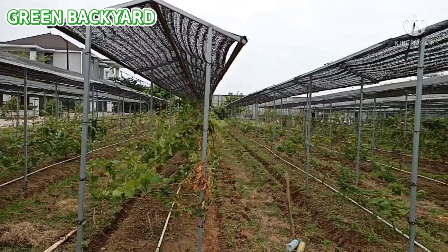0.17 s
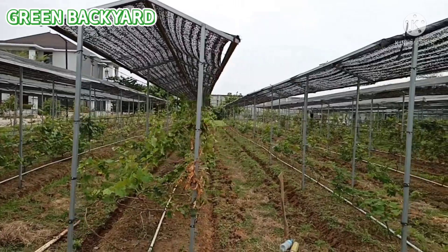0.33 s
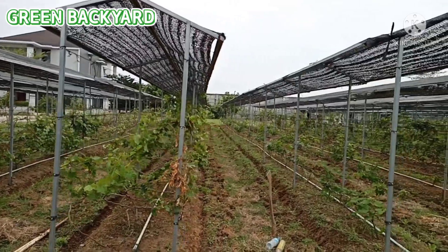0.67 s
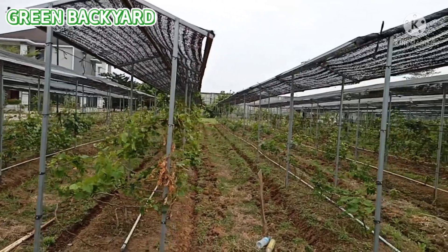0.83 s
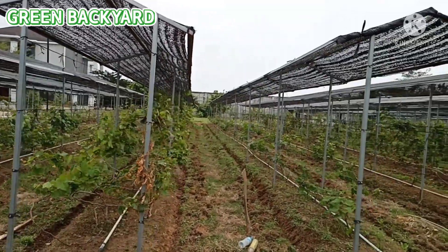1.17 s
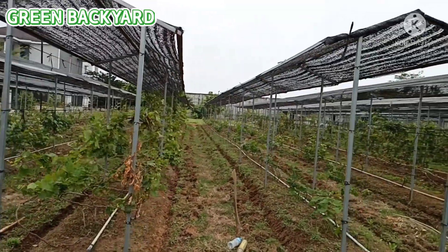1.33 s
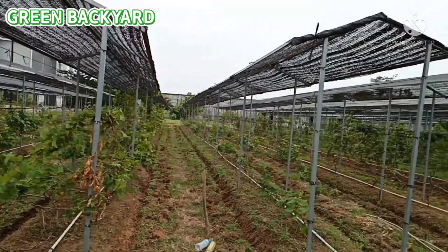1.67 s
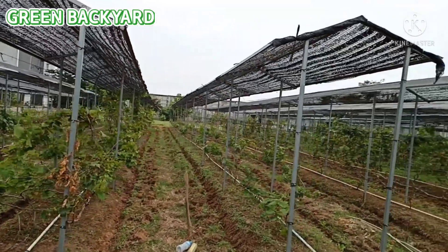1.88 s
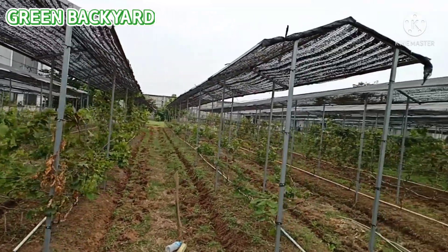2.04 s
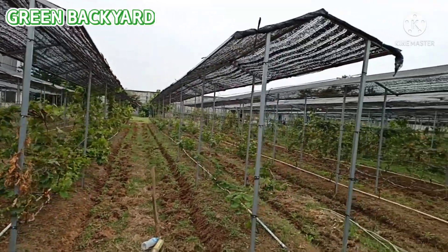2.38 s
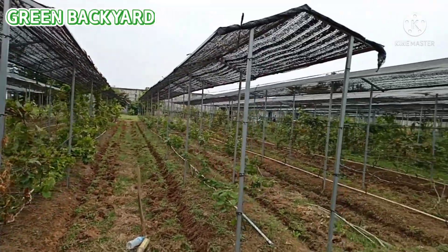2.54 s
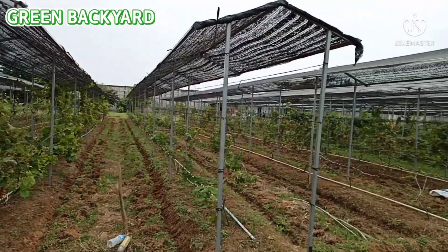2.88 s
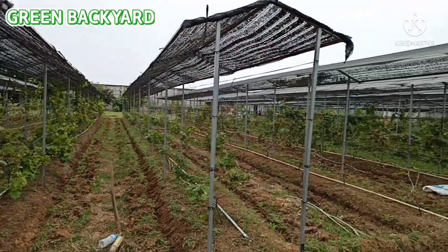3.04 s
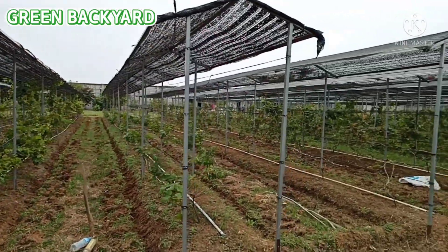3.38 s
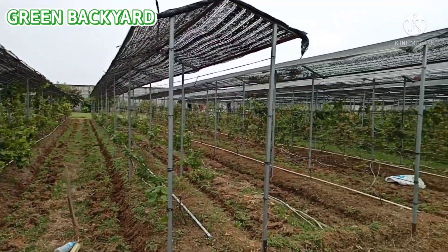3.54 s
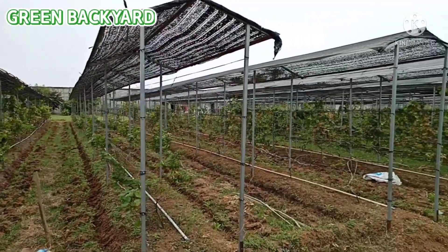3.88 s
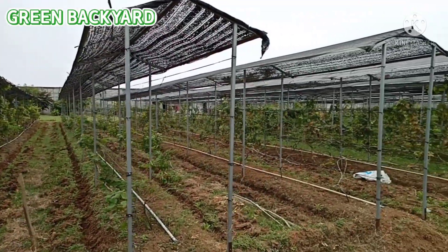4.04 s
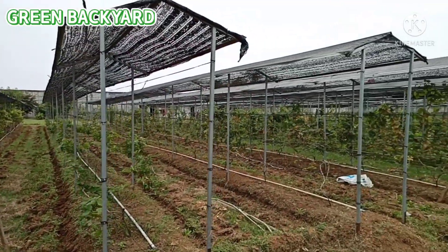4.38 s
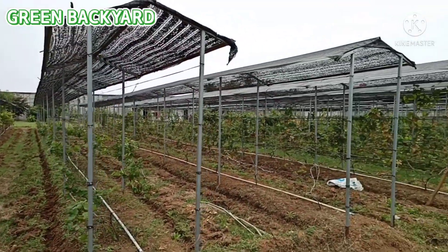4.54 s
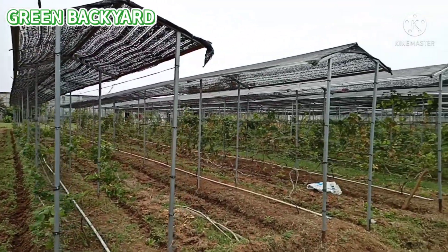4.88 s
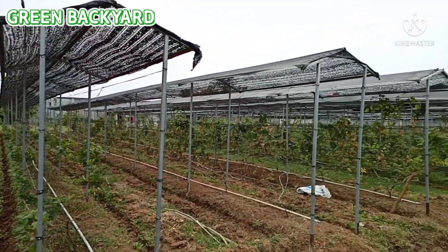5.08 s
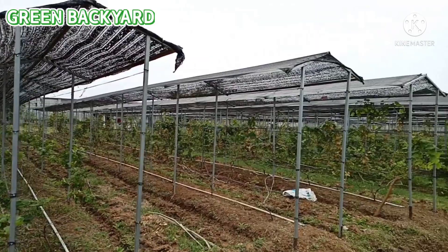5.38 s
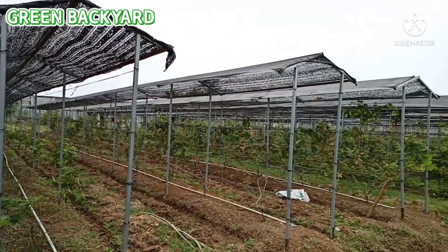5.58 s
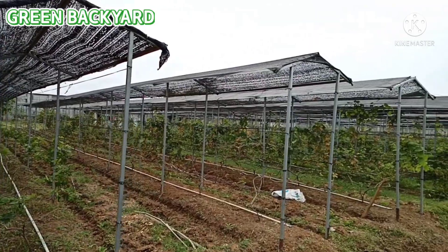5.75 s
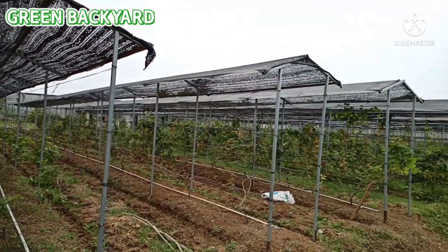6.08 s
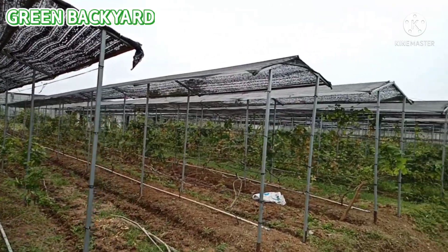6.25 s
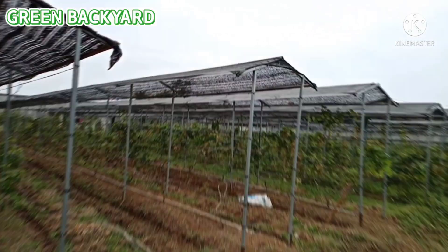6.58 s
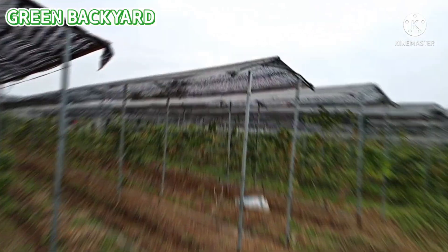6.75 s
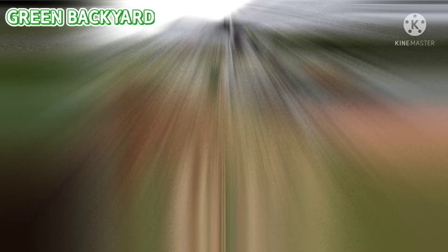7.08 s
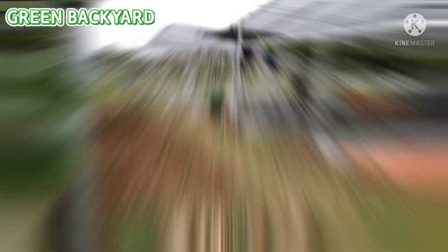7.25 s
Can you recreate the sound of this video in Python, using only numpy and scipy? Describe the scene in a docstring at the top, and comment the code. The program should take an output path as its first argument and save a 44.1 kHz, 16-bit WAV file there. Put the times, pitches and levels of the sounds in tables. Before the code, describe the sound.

A songbird whistles two short phrases outdoors while smaller birds chirp further off, over soft air and a faint electric hum.

```python
"""A songbird whistles two short phrases over a vegetable plot; ground, shade roofs and a house echo it.
Each whistle is one smooth arc of pitch, and the song ends in a hoarse flourish and a throaty chuck.
Smaller birds chirp further off, mostly as reverberation. The hand-held microphone bumps and clicks at
the start, and later something dry crunches underfoot. A faint electric hum and outdoor air lie below."""
import sys
import numpy as np
from scipy import signal
from scipy.fft import rfft, irfft
from scipy.io import wavfile
from scipy.ndimage import uniform_filter1d

SR = 44100
rng = np.random.default_rng(int(sys.argv[2]) if len(sys.argv) > 2 else 0)


def int16_out(signal):
    """Quantize to a 16-bit WAV file."""
    q = np.round(np.clip(np.atleast_2d(signal).T, -1, 1) * 32767)
    wavfile.write(sys.argv[1], SR, q.astype(np.int16))


N = 327222
TIME = np.arange(N) / SR
TOP_HZ = 15600

# The songbird's whistles. Each row: start and length in seconds, first, middle and last pitch in Hz,
# level in dB, attack in seconds, overtone trim in dB.
WHISTLES = [ (.405, .287, 2500, 2790, 3010, -23.3, .095, -2),
            (.938, .172, 2110, 1705, 2080, -32.5, .018, -2), (1.322, .108, 2440, 2440, 2432, -24, .04, -3),
            (4.688, .226, 3690, 3485, 3400, -24.3, .05, 1), (5.036, .168, 2080, 1660, 2190, -31.5, .02, 1),
            (5.359, .12, 2650, 2475, 2470, -24, .035, 2), (5.738, .052, 1230, 1530, 1660, -32.5, .036, -2),
            (5.863, .034, 2170, 2280, 1950, -34.5, .01, 6), (5.939, .042, 2180, 2260, 1600, -28, .014, 6)]
SCOOP_DEPTH, SCOOP_SHARE = .1, .065  # share of the pitch; time constant as a share of the length
# Throat and beak as an EQ on the overtones. Each row: frequency in Hz, gain in dB.
OVERTONE_EQ = [(2600, -21.5), (3500, -35), (5000, -34.5), (5900, -36.5), (6900, -30), (7600, -47.5),
               (8700, -48), (9900, -31.5), (11300, -44), (12300, -41.5), (14500, -54.5)]
# The throat's resonance on the chuck. Each row: frequency in Hz, gain in dB.
CHUCK_EQ = [(700, -21.5), (1100, -6.5), (1500, 11), (2250, 0), (2800, -5.5), (3400, -18), (4500, -28),
            (6800, -33), (9000, -34)]
# Hard surfaces near the singer. Each row: delay in seconds, gain in dB.
REFLECTIONS = [(.0071, -14), (0.0165, -9.5), (.073, -16), (.225, -26)]

# The small bird's chirps. Each row: start in seconds, relative level in dB.
CHIRP_CUES = [(1.841, -51.5), (2.098, -48.5), (2.338, -48), (2.583, -48), (2.829, -47.5), (3.076, -47),
              (4.417, -50), (5.548, -51.5), (7.024, -55.5)]
# Their upsweep: first, middle and last pitch in Hz.
CHIRP_SWEEP = (3240, 4520, 5380)
# Its throat favours the middle of the sweep. Each row: frequency in Hz, gain in dB.
CHIRP_EQ = [(2950, -2), (3200, .5), (3600, -2.5), (4250, 4), (4700, -1.5), (5300, -4.5)]
# Distant whistles. Each row: start and length in seconds, first, middle and last pitch in Hz,
# relative level in dB, attack in seconds.
FAR_WHISTLES = [ (1.825, .05, 2360, 2540, 2560, -48, .01), (2.585, .05, 2550, 2250, 2000, -51, .035),
                (2.898, .048, 1850, 2130, 2200, -44.5, .02), (3.005, .08, 2190, 2280, 2020, -43.5, .015),
                (4.76, .13, 1790, 2200, 2680, -50, .06), (6.84, .2, 2970, 2880, 2800, -67, .08)]
# One harsh falling slur, laid out like a row of FAR_WHISTLES.
HARSH_SLUR = (3.256, .14, 3120, 2450, 1900, -40, .007)
# Thin high buzzes. Each row: start and length in seconds, relative level in dB.
BUZZ_CUES = [(1.115, .11, -57.5), (1.24, .22, -65), (2.975, .13, -65), (4.84, .19, -66), (6.985, .14, -63)]

# Knocks on the microphone. Each row: start in seconds, pitch in Hz, length in seconds,
# envelope peak in dB.
MIC_KNOCKS = [(.152, 260, 0.0073, -38.5), (0.2306, 170, 0.0053, -30), (0.244, 191, 0.016, -36),
              (0.2576, 82, 0.016, -20.5), (2.927, 794, 0.023, -48.5)]
# A handling click on the microphone, then dry crunches. Each row: start and decay time in seconds,
# crackle level and body level in dB.
CLICK_AND_CRUNCH_CUES = [(0.227, 0.0046, -66, -45), (2.324, 0.0069, -48.5, -50.5), (2.354, .005, -54, -64),
                         (2.605, .004, -56, -68), (3.581, 0.011, -47.5, -48), (3.596, 0.019, -46, -45.5),
                         (3.621, 0.0083, -47.5, -39), (3.635, 0.068, -54, -71)]
# The electric hum. Each row: harmonic number, level in dB.
HUM_HARMONICS = [(2, -69), (3, -66), (4, -74), (5, -69.5), (6, -70.5), (7, -72.5), (8, -76.5), (9, -76),
                 (10, -74), (12, -74.5), (13, -71), (14, -71)]
# The tone of the outdoor air. Each row: frequency in Hz, relative level in dB.
AIR_EQ = [(15, -12), (25, 4), (136, -6), (215, -10.5), (233, -7), (331, -10.5), (359, -9.5), (389, -12.5),
          (482, -10.5), (804, -13.5), (945, -15.5), (2500, -15), (3400, -15.5), (4400, -15.5), (5730, -20),
          (6730, -24), (15500, -27)]
# The air's stereo width. Each row: frequency in Hz, side level against mid in dB.
AIR_WIDTH = [(60, -23.5), (110, -18), (200, -19), (380, -18.5), (700, -15), (1290, -16.5), (2380, -33),
             (4400, -22.5), (8120, -3.5), (15000, -5)]


def songbird(hoarse_from_s=5.85, flutter_db_per_s=8):
    """An almost pure whistle; throat and beak let weak overtones through, more in the hoarse ending."""
    song = np.array(WHISTLES)
    phase, loudness = syrinx(song[:, :-1], release_s=.012, waver=.003, scoop=SCOOP_DEPTH)
    current_note = np.searchsorted(song[:, 0], TIME) - 1
    _, length, *_, trim_db = song[current_note].T
    loudness *= undb(flutter_db_per_s * length * drift(90))  # longer notes flutter more
    hz = np.gradient(phase) * SR / (2 * np.pi)
    rasp_radians = np.where(TIME > hoarse_from_s, .16, .035)
    phase += rasp_radians * drift(1000)
    overtones = sum(np.sin(k * phase) * (k * hz < TOP_HZ) for k in range(2, 7))
    overtones = equalise(loudness * undb(trim_db) * overtones, OVERTONE_EQ)
    # the beak beams the overtones elsewhere, so they arrive mostly scattered
    scattered = scatter(overtones, t60=.2, build_s=.0095)
    return loudness * np.sin(phase) + undb(-7) * overtones + undb(-1.5) * scattered


def chuck(start_s=5.985, length_s=.075, pitch_hz=1155, sag_hz=440):
    """Sung low, the closing note is rich in harmonics, and the throat brings out the second."""
    t = TIME - start_s
    hz = pitch_hz - sag_hz * np.clip(t / length_s, 0, 1) ** 6  # holds, then sags ever faster
    hz *= 1 + .012 * drift(400)
    phase = 2 * np.pi * np.cumsum(hz) / SR
    loudness = np.sqrt(2) * undb(-41) * envelope(t, length_s, attack_s=.012, release_s=.02)
    harmonics = sum(np.sin(k * phase) for k in range(1, 8))
    return equalise(loudness * harmonics, CHUCK_EQ)


def syrinx(notes, release_s, waver, scoop=0, hold_s=0):
    """Phase and loudness of a bird's voice singing notes in turn, each an unsteady arc of pitch."""
    phase, loudness = np.zeros((2, N))
    wobble = 1 + waver * drift(250)
    for start, length, first, middle, last, db, attack_s in notes:
        now = slice(*np.searchsorted(TIME, [start, start + length]))
        t = TIME[now] - start
        progress = np.maximum(t - hold_s, 0) / (length - hold_s)
        parabola = np.polyfit([0, .5, 1], [first, middle, last], 2)
        flat_by = scoop * np.exp(-t / (SCOOP_SHARE * length))  # scoops up into the note
        hz = np.polyval(parabola, progress) * (1 - flat_by)
        phase[now] = 2 * np.pi * np.cumsum(hz * wobble[now]) / SR
        loudness[now] = np.sqrt(2) * undb(db) * envelope(t, length, attack_s, release_s)
    return phase, loudness


def envelope(t, length, attack_s, release_s):
    """A note swells, holds and closes softly."""
    attack = np.clip(t / attack_s, 0, 1)
    release = np.clip((length - t) / release_s, 0, 1)
    return attack * np.sin(release * np.pi / 2) ** 2


def garden(song):
    """The direct song, slaps off hard surfaces, a brief wash from nearby leaves and the plot's tail."""
    slaps = sum(undb(db) * np.pad(song, (int(delay * SR), 0))[:N] for delay, db in REFLECTIONS)
    leaves = scatter(song, t60=.3, build_s=.006)
    tail = scatter(song, t60=1, build_s=.012)
    return undb(-.4) * song + slaps + undb(-15) * leaves + undb(-11.5) * tail


def scatter(x, t60, build_s):
    """Leaves, poles and nets return a dense tail that builds up, then dies away."""
    t = TIME[:2 * SR]
    tail = rng.standard_normal(len(t)) * undb(-60 * t / t60) * (1 - np.exp(-t / build_s))
    return signal.fftconvolve(x, tail / np.linalg.norm(tail))[:N]


def small_bird(length_s=.093, attack_s=.009):
    """A far chirp scoops, lingers and sweeps up, never quite the same twice, and mostly as reverb."""
    tunings = 1 + .008 * rng.standard_normal(len(CHIRP_CUES))
    notes = [(start, length_s, *(tuning * np.array(CHIRP_SWEEP)), db, attack_s)
             for (start, db), tuning in zip(CHIRP_CUES, tunings)]
    phase, loudness = syrinx(notes, release_s=.014, waver=.0152, scoop=SCOOP_DEPTH, hold_s=.017)
    chirps = equalise(loudness * np.sin(phase), CHIRP_EQ)
    return undb(-3) * chirps + undb(6) * scatter(chirps, t60=1, build_s=.008)


def distant_birds():
    """Thin whistles, pips, high buzzes and one harsh slur, more wet than dry with distance."""
    voices = [syrinx(FAR_WHISTLES, release_s=.025, waver=.018),
              syrinx(pip_notes(), release_s=.015, waver=.028),
              syrinx(buzz_notes(), release_s=.05, waver=.02),
              syrinx([HARSH_SLUR], release_s=.04, waver=.07)]
    calls = sum(loudness * np.sin(phase) for phase, loudness in voices)
    return undb(-3.5) * calls + undb(-2) * scatter(calls, t60=.95, build_s=.008)


def pip_notes(count=10, start_s=6.385, spacing_s=.063, length_s=.045, attack_s=.01, relative_db=-60):
    """A run of faint, even pips that steps up in pitch and levels off."""
    first_hz, top_hz, climb_s = 4680, 5900, .26
    offsets = spacing_s * np.arange(count)
    pitches = top_hz - (top_hz - first_hz) * np.exp(-(offsets / climb_s) ** 2)
    return [(start_s + offset, length_s, hz, hz, hz, relative_db, attack_s)
            for offset, hz in zip(offsets, pitches)]


def buzz_notes(first_hz=7350, sag_hz_per_s=1100, attack_s=.012):
    """High notes that all start on one pitch and sink at one rate."""
    progress = np.array([0, .5, 1])
    return [(start, length, *(first_hz - sag_hz_per_s * length * progress), db, attack_s)
            for start, length, db in BUZZ_CUES]


def microphone_bumps():
    """Each knock on the housing gives a heavily damped low swing."""
    thumps = np.zeros(N)
    for start, hz, length, db in MIC_KNOCKS:
        t = np.maximum(TIME - start, 0)
        age = 5 * t / length  # the envelope peaks a fifth of the way in
        thumps += undb(db) * age * np.exp(1 - age) * np.sin(2 * np.pi * hz * t)
    return thumps


def click_and_crunches():
    """A handling click on the microphone, then dry crunches: tiny cracks over a duller body."""
    spikes_db = 4 * np.minimum(rng.exponential(size=N), 4)
    crackle = unit_rms(bandpass(rng.standard_normal(N) * undb(spikes_db), 2000, 11000))
    body = unit_rms(bandpass(rng.standard_normal(N), 370, 2250))
    bursts = np.zeros(N)
    for start, decay, crackle_db, body_db in CLICK_AND_CRUNCH_CUES:
        fade = (TIME >= start) * np.exp(-np.abs(TIME - start) / decay)
        bursts += fade * (undb(crackle_db) * crackle + undb(body_db) * body)
    return bursts


def electric_hum(fundamental_hz=121.4, waver_db=.83):
    """Harmonics of a distant electric machine, each wavering on its way through the air."""
    hz = fundamental_hz * (1 + .00083 * drift(2.47))
    phase = 2 * np.pi * np.cumsum(hz) / SR
    hum = np.zeros(N)
    for harmonic, db in HUM_HARMONICS:
        loudness = np.sqrt(2) * undb(db + waver_db * drift(1.7))
        hum += loudness * np.sin(harmonic * phase + rng.uniform(0, 2 * np.pi))
    return hum


def outdoor_air(mid_db=-55, waver_db=.5):
    """A soft bed of noise, nearly mono in the bass and wider in the hiss."""
    mid, side = (unit_rms(equalise(rng.standard_normal(N), AIR_EQ)) for _ in range(2))
    side = equalise(side, AIR_WIDTH)
    return undb(mid_db + waver_db * drift(4.6)) * np.array([mid + side, mid - side])


def undb(db):
    """Decibels to gain."""
    return 10 ** (np.asarray(db) / 20)


def unit_rms(x):
    """Scale to rms 1."""
    return x / np.sqrt(np.mean(x ** 2))


def equalise(x, curve):
    """EQ through (Hz, dB) points joined on a log-frequency axis."""
    hz, db = np.transpose(curve)
    bin_hz = np.maximum(np.arange(N // 2 + 1) * SR / N, 1)
    gain = undb(np.interp(np.log(bin_hz), np.log(hz), db))
    return irfft(rfft(x) * gain, N)


def bandpass(x, low_hz, high_hz):
    """Gentle band-pass."""
    return signal.sosfilt(signal.butter(2, [low_hz, high_hz], "band", fs=SR, output="sos"), x)


def drift(rate_hz):
    """Smooth random modulation with rms 1."""
    window = max(int(SR / rate_hz), 2)
    return unit_rms(uniform_filter1d(uniform_filter1d(rng.standard_normal(N), window), window))


def scene():
    """All sources sit in the centre; only the air has width."""
    birds = garden(songbird() + chuck()) + small_bird() + distant_birds()
    return birds + microphone_bumps() + click_and_crunches() + electric_hum() + outdoor_air()


def record(dry, open_s=.083):
    """The microphone opens just after the start and cuts the top steeply."""
    fade_in = np.clip((TIME - open_s) * 500, 0, 1)  # 2 ms
    high_cut = signal.ellip(10, .2, 70, TOP_HZ, fs=SR, output="sos")
    return signal.sosfilt(high_cut, dry * fade_in)


dry = scene()
out = record(dry)
int16_out(out)
```